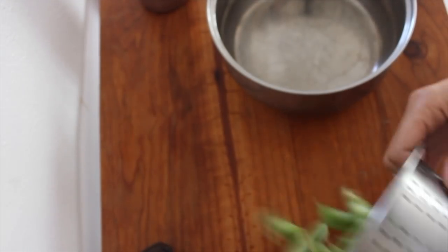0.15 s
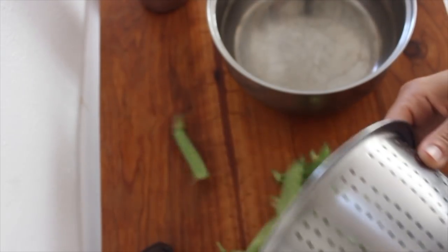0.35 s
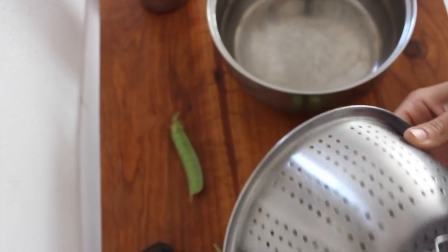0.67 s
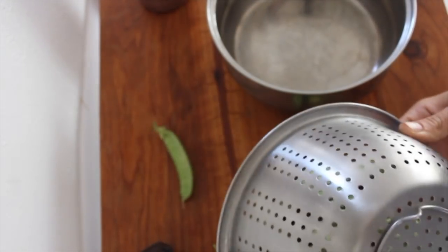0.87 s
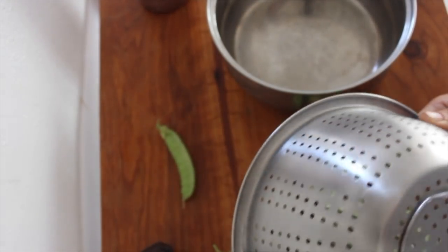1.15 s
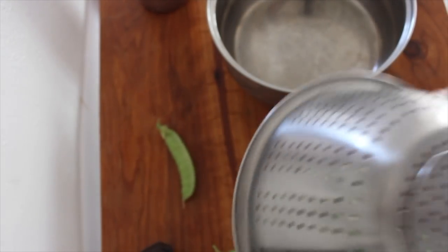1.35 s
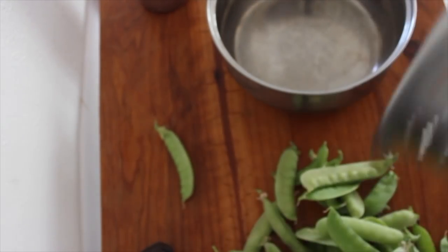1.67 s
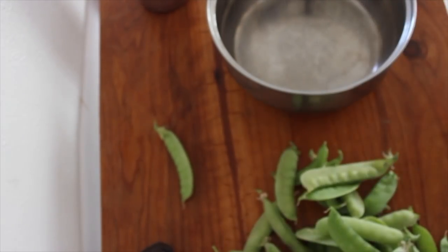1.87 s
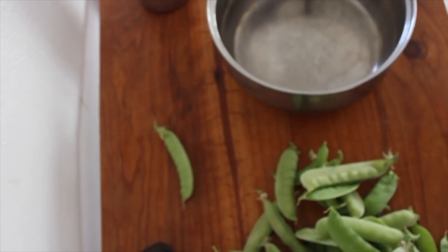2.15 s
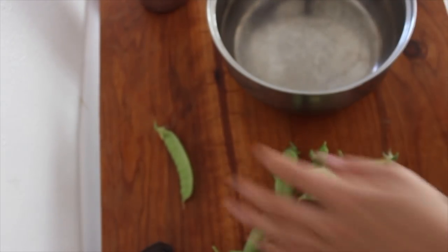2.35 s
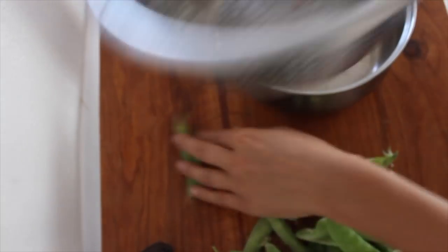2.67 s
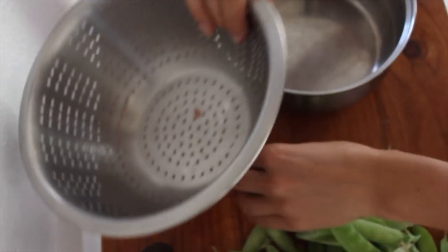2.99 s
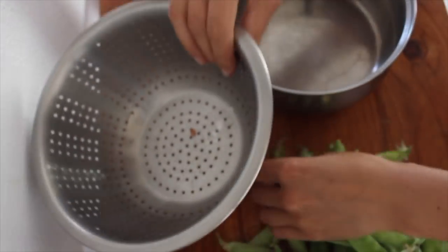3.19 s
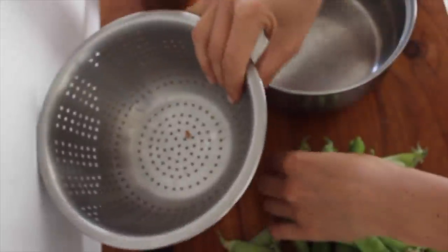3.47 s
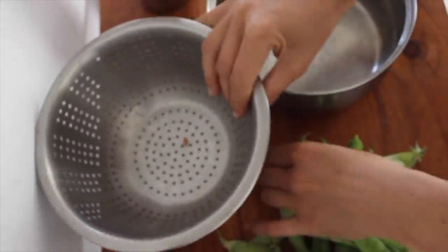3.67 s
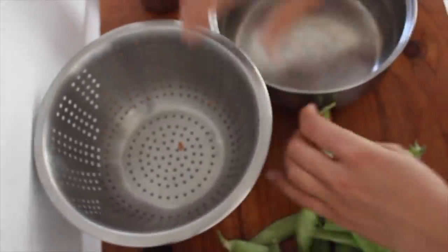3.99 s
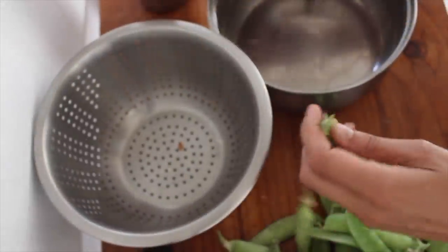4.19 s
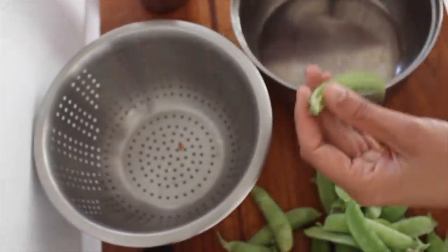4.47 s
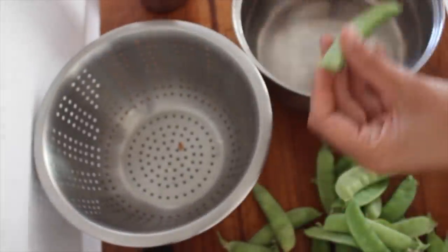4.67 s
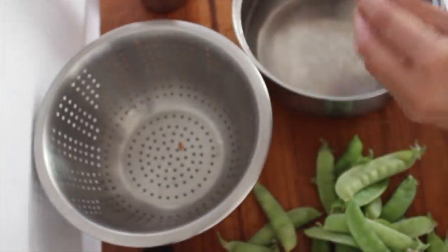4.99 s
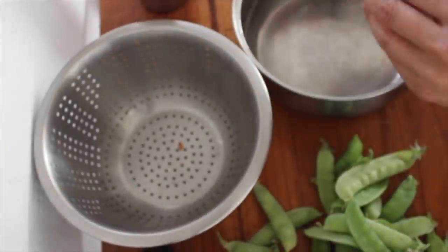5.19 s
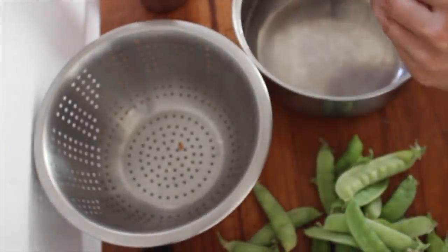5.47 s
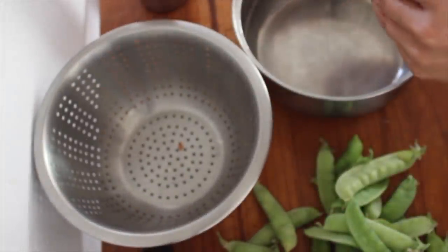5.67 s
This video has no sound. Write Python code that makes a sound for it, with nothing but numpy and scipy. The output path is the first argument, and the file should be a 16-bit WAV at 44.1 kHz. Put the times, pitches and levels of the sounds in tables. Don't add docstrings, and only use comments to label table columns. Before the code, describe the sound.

One close microphone in a quiet outdoor spot: a sudden hard knock with a metallic clank, then pods pattering and snapping on hollow wood, fading within about a second and a half. Soft touches and a brush of fingers lead to a colander set down, a bright clink, short gritty drags and low bumps, then only faint hiss and insects.

```python
import sys
import numpy as np
from scipy import signal
from scipy.fft import rfft, irfft
from scipy.io import wavfile

SR = 44100
rng = np.random.default_rng(int(sys.argv[2]) if len(sys.argv) > 2 else 0)


def output_pcm(signal):
    pcm = np.clip(np.atleast_2d(signal).T, -1, 1) * 32767
    wavfile.write(sys.argv[1], SR, np.round(pcm).astype(np.int16))


def gain_from_decibels(decibels):
    exponent = np.asarray(decibels, float) / 20
    return 10 ** exponent


N = 257544

# mode_hz, level_db, t60_s
TABLE_MODES = [(185, -10, 0.24), (205.6, -9, 0.24), (253.1, -4, .3), (300.4, -9, 0.2), (334, 1.5, 0.2),
               (397.8, -5.5, .2), (464.2, -8, 0.12), (548.4, -8.5, 0.182), (607.4, -8.5, 0.199),
               (648, 0.5, 0.12), (695, -2.5, 0.12), (746, -1.5, 0.14), (768, -5, 0.14), (813, -14, 0.16),
               (916, -10.5, 0.14), (1017, -11, 0.093), (1150, -11, 0.12), (1356, -5.5, 0.083),
               (1358, -8, 0.098), (1674, -14.5, 0.063)]
# mode_hz, level_db, t60_s
STEEL_MODES = [(1042, -18.5, 0.37), (1320, -8.5, .3), (1330, -1.5, 0.21), (1470, -15, 0.43),
               (1566, -3, 0.15), (1710, -4.5, 0.18), (1940, -19.5, 0.5), (2110, -10, 0.12),
               (2470, -10, 0.1), (2630, -5, 0.09), (2796, -18, 0.13), (3079, -9.5, 0.15), (4133, -16, .1),
               (5140, -6, 0.2), (5640, -3, 0.052), (6200, -2.5, 0.043), (6800, -6.5, 0.2),
               (7430, -7, 0.0525), (8110, 5, 0.07), (9000, -5.5, 0.12), (8570, 4, 0.09),
               (10800, -22, 0.093)]
# start_s, peak_db
THUMPS = [(0.053, -25), (.23, -36), (0.397, -31), (.7, -34.5), (1.029, -39), (1.2, -46.5), (1.448, -41),
          (1.842, -38.5), (2.64, -43), (2.698, -57), (2.96, -45), (3.1, -40.5), (3.5, -22), (3.828, -30),
          (3.945, -25), (3.979, -40), (4.246, -30), (4.298, -48)]


def rms_one(x):
    return x / np.sqrt(np.mean(x ** 2) + 1e-20)


def in_time(rows):
    s, *columns = np.transpose(rows)
    return [np.interp(np.arange(N) / SR, s, c, -140, -140) for c in columns]


def drift(rate_hz):
    knots = rng.standard_normal(400)
    return np.interp(np.arange(N) / SR * rate_hz, np.arange(400), knots)


def swell(middle_s, half_s):
    return np.exp(-((np.arange(N) / SR - middle_s) / half_s) ** 2)


def coloured(x, spectrum):
    hz, db = np.transpose(spectrum)
    log_hz = np.log(np.fft.rfftfreq(len(x), 1 / SR) + 1)
    gain = gain_from_decibels(np.interp(log_hz, np.log(hz), db))
    return rms_one(irfft(rfft(x) * gain, len(x)))


def grains(per_s, spread_db):
    sizes = gain_from_decibels(spread_db * np.minimum(rng.exponential(1, N), 4))
    signs = rng.choice([-1, 1], N)
    happens = rng.random(N) < per_s * gain_from_decibels(4 * drift(25)) / SR
    return sizes * signs * happens + 1e-18


def ring(x, hz, t60):
    r, w = gain_from_decibels(-60 / (t60 * SR)), 2 * np.pi * hz / SR
    return signal.lfilter([0, np.sin(w)], [1, -2 * r * np.cos(w), r * r], x)


def ring_twice(x, hz, width_hz):
    t60 = 2.2 / width_hz
    return rms_one(ring(ring(x, hz, t60), hz, t60))


def band(x, low_hz, high_hz):
    return signal.sosfilt(signal.butter(2, [low_hz, high_hz], "band", fs=SR, output="sos"), x)


def burst(t60, size=13000):
    return rng.standard_normal(size) * gain_from_decibels(-60 * np.arange(size) / SR / t60)


def add(track, s, db, sound):
    i = round(s * SR)
    track[i:i + len(sound)] += (gain_from_decibels(db) * sound / np.max(np.abs(sound)))[:N - i]


def struck(modes, contact_s, damping, scatter_db, centre_hz, slope_db, rise_s):
    contact = burst(contact_s)
    contact *= 1 - np.exp(-np.arange(len(contact)) / SR / rise_s)
    out = 0
    for hz, db, t60 in modes:
        away_db = slope_db * abs(np.log2(hz / centre_hz))
        level_db = db + scatter_db * rng.standard_normal() - away_db
        out = out + gain_from_decibels(level_db) * ring(contact, hz, t60 * damping)
    return out


def outdoors():
    # freq_hz, level_db
    air_curve = [(12, -23.5), (20, -6.5), (193, -10.5), (270, -10.5), (328, -13.5), (377, -8.5), (738, -10),
                 (1760, -14.5), (2820, -14), (3840, -16), (4940, -11), (5850, -16), (16000, -18.5)]
    # centre_hz, width_hz, level_db, flicker_db
    choruses = [
        (4930, 420, -67.5, -2.5),
        (3000, 790, -69, 6),
        (1140, 770, -67, -4),
    ]
    # middle_s, half_length_s, level_db
    rasp_rows = [
        (1.568, 0.056, -60),
        (1.693, 0.038, -57.5),
        (1.804, 0.039, -57),
        (2.026, 0.032, -60),
        (2.138, 0.028, -59),
        (4.743, 0.038, -64),
    ]
    out = gain_from_decibels(-57) * coloured(rng.standard_normal(N), air_curve)
    for hz, width_hz, db, flicker_db in choruses:
        chorus = ring_twice(rng.standard_normal(N), hz, width_hz)
        out += gain_from_decibels(db + flicker_db * drift(6.2)) * chorus
    rasp = rms_one(band(band(grains(3300, spread_db=3.0), 2460, 3500), 2460, 3500))
    return out + rasp * sum(gain_from_decibels(db) * swell(s, half_s) for s, half_s, db in rasp_rows)


def room(x):
    tail = band(burst(0.31, size=30000), 210, 3600)
    echoes = np.pad(tail / np.linalg.norm(tail), (300, 0))
    return gain_from_decibels(-13) * signal.fftconvolve(x, echoes)[:N]


def shudder(level):
    # freq_hz, level_db
    shake_curve = [(8.8, -28), (15, -5), (27, 2.5), (43, -5.5), (75, -2), (113, -9), (170, -6.5),
                   (220, -30), (370, -120)]
    legs = rms_one(ring(band(rng.standard_normal(N), 40, 96), 63, .08))
    shake = coloured(rng.standard_normal(N), shake_curve)
    return level * (0.68 * shake + 0.26 * legs) * gain_from_decibels(2.7 * drift(5.8))


def rocking():
    loss_db_per_s, rise_s = 45.5, 0.011
    start_s, peak_db = np.array(THUMPS)[:, :1], np.array(THUMPS)[:, 1:]
    after = np.arange(N) / SR - start_s
    level = gain_from_decibels(peak_db - 3.5 - loss_db_per_s * after) * np.clip(after / rise_s, 0, 1)
    return np.sqrt(np.sum(level ** 2, axis=0))


def thumps():
    out = np.zeros(N)
    for s, db in THUMPS:
        add(out, s, db - 7.5, ring(band(burst(0.078), 30, 106.6), 36, 0.16))
    return out


def hums():
    # middle_s, half_length_s, level_db, pitch_hz, width_hz
    hum_rows = [(4.38, 0.087, -55.5, 6130, 220), (1.675, 0.16, -56.5, 276, 130),
                (3.66, 0.11, -53, 500, 110), (3.67, 0.2, -46, 169, 79), (4.445, 0.17, -45, 458, 65),
                (3.57, .02, -58, 6750, 300), (4.4, 0.089, -58, 8000, 90), (4.33, .02, -49, 1200, 97),
                (0.878, .025, -30.5, 410, 200), (3.25, 0.068, -59, 450, 47), (.12, .03, -37.5, 1860, 270),
                (4.34, 0.052, -58, 6800, 150), (3.79, .05, -48, 6750, 120), (3.91, .035, -49, 7800, 200),
                (3.91, .03, -56, 5500, 150), (3.885, .012, -52, 6150, 200), (.755, .03, -48, 8600, 1200),
                (0.86, 0.037, -54, 8700, 200), (0.865, 0.037, -56, 7450, 120), (.1, 0.028, -25, 380, 130)]
    noise, out = rng.standard_normal(N), np.zeros(N)
    for s, half_s, db, hz, width_hz in hum_rows:
        near = slice(max(round((s - .5) * SR), 0), round((s + .5) * SR))
        out[near] += gain_from_decibels(db) * swell(s, half_s)[near] * ring_twice(noise[near], hz, width_hz)
    return out


def swishes():
    # middle_s, half_length_s, level_db, low_hz, high_hz
    strokes = [(0.3, 0.073, -45, 3000, 15100), (0.762, 0.069, -46.5, 1978, 12400),
               (2.288, 0.05, -54, 2410, 10900), (2.528, 0.05, -57, 2200, 7860),
               (2.646, 0.017, -48, 5000, 15000), (3.19, 0.03, -38.5, 1480, 10000),
               (3.81, 0.022, -50.5, 4500, 15100), (4.37, 0.093, -55.5, 5800, 6800),
               (4.55, 0.028, -57, 5700, 7020), (0.044, 0.011, -40, 9000, 15500),
               (2.063, .02, -53.5, 12800, 14750), (3.23, 0.14, -53, 1610, 4640),
               (4.908, 0.062, -60.5, 5000, 11980)]
    friction, out = grains(4000, spread_db=3.0), np.zeros(N)
    for s, half_s, db, low_hz, high_hz in strokes:
        brushed = rms_one(band(band(friction, low_hz, high_hz), low_hz, high_hz))
        out += gain_from_decibels(db) * swell(s, half_s) * brushed
    return out


def movement(weight_db, friction_db, rub_db, top, per_s, spread_db):
    # freq_hz, level_db
    rub_curve = [(590, -38), (1000, -17), (1510, -0.5), (1820, -0.5), (2070, -2), (2560, -3), (5500, -15),
                 (7150, -36.5), (12100, -120)]
    contacts, board = grains(per_s, spread_db), np.zeros(N)
    for k, (hz, db, t60) in enumerate(TABLE_MODES):
        tilt_db = 0.5 * np.log2(hz)
        board += (-1) ** k * gain_from_decibels(db + tilt_db) * ring(contacts, hz, 0.27 * t60)
    rub_level = gain_from_decibels(rub_db + friction_db + 0.34 * (weight_db - friction_db))
    rub = rub_level * coloured(grains(5000, spread_db=4.5), rub_curve)
    shake = shudder(gain_from_decibels(weight_db - 9.5))
    return shake + gain_from_decibels(weight_db) * rms_one(board) + rub + gain_from_decibels(friction_db) * top


def scrape():
    # freq_hz, level_db
    hiss_curve = [(2350, -47), (4000, -14), (6250, -9.5), (7480, -4), (8310, 4), (9770, -4.5), (13900, -12),
                  (16000, -27)]
    grit = grains(2800, spread_db=1.0) * gain_from_decibels(4.6 * drift(30))
    singing = np.zeros(N)
    for hz, db, t60 in STEEL_MODES:
        if hz > 4500:
            singing += gain_from_decibels(.6 * db + 2.5 * drift(9)) * rms_one(ring(grit, hz, .3 * t60))
    hiss = coloured(grains(6800, spread_db=3.0), hiss_curve)
    return rms_one(0.7 * rms_one(singing) + 1.04 * hiss)


def shoves():
    # start_s, pressure_db, sliding_db, loss_db_per_s
    shove_rows = [(3.439, -47.5, -53, 142), (3.512, -36, -44.5, 96), (3.66, -49, -55.5, 15),
                  (3.785, -53, -50, 40), (3.818, -41, -58, 95), (3.9, -48.5, -46, 72),
                  (3.986, -31, -53, 59), (4.259, -50, -44, 400), (4.321, -36.5, -50, 36),
                  (4.46, -40, -54, 55), (4.55, -42, -59, 99)]
    attack_s, hold_s = 0.016, 0.11
    t, power = np.arange(N) / SR, np.full((2, N), 1e-14)
    for s, pressure_db, sliding_db, loss in shove_rows:
        after = np.maximum(t - s, 0)
        fall_db = -loss * (after + 3.5 * np.maximum(after - hold_s, 0))
        rise = np.clip(1 + (t - s) / attack_s, 0, 1)
        power += (rise * gain_from_decibels(fall_db) * gain_from_decibels(np.array([[pressure_db], [sliding_db]]))) ** 2
    return 10 * np.log10(power)


def dragged_steel():
    return movement(*shoves(), rub_db=-5.5, top=scrape(), per_s=1500, spread_db=3.0)


def clinks():
    # start_s, peak_db, pitch_hz, bright_db re peak, damping_share
    clink_rows = [
        (0.0584, -11.5, 1540, -11, 0.17),
        (3.1526, -22, 2640, -8, 0.49),
        (3.436, -43, 2520, 17, 0.24),
        (3.5041, -17, 2290, -15.5, 0.66),
        (3.5704, -18.5, 1800, -10.5, 0.32),
        (3.8195, -38, 2130, -25, 0.38),
        (3.8687, -36, 1710, 5.5, 0.28),
        (3.949, -26.5, 2320, -3, 0.59),
        (3.983, -10.5, 3300, -11.5, 0.51),
        (4.25, -42.5, 3170, 7, 0.8),
    ]
    # start_s, pitch_hz, peak_db, contact_s, t60_s
    ring_rows = [(.484, 5700, -39, 0.088, 0.04), (.759, 1175, -39, 0.21, .04),
                 (.94, 1180, -31.5, 0.21, 0.0097), (.979, 1124, -29.5, 0.056, 0.025),
                 (1.376, 1183, -41, 0.028, 0.043), (2.898, 1105, -38, 0.048, .16),
                 (2.899, 457, -35.5, 0.052, .04), (.057, 1500, -9.5, 0.094, 0.013),
                 (3.568, 3960, -40.5, 0.016, 0.038), (3.504, 5250, -40, .011, 0.068),
                 (4.34, 300, -25, 0.25, 0.059), (3.435, 2420, -37.5, .03, 0.018),
                 (3.508, 2143, -45, .006, .5), (3.56, 1708, -36, .02, .15), (3.821, 1705, -42, .012, .15),
                 (3.885, 2722, -43, .02, .7), (3.992, 3079, -30, .003, .17), (3.99, 1959, -55, .02, 1.0),
                 (2.66, 280, -47.5, 0.39, 0.1), (3.04, 318, -39.5, 0.65, 0.11), (2.94, 433, -43, 0.2, 0.13),
                 (4.0, 168.5, -27, 0.23, .06), (4.545, 328, -37.5, 0.23, 0.063)]
    out = np.zeros(N)
    low = [m for m in STEEL_MODES if m[0] < 4500]
    bright = [m for m in STEEL_MODES if m[0] > 4500]
    for s, db, hz, bright_db, damping in clink_rows:
        body = struck(low, 0.0052, damping, scatter_db=-2.5, centre_hz=hz, slope_db=23.5, rise_s=0.00025)
        add(out, s, db - 5.5, body)
        sheen = struck(bright, 0.047, 0.68 * damping, scatter_db=1.5, centre_hz=8280, slope_db=0.5,
                       rise_s=0.00031)
        add(out, s, db + bright_db - 2.5, sheen)
    for s, hz, db, contact_s, t60 in ring_rows:
        contact = band(burst(contact_s, size=30000), hz / 1.176, hz * 1.135)
        add(out, s, db, ring(contact, hz, t60))
    return out


def taps():
    # start_s, peak_db, pitch_hz
    pod_rows = [(0.0579, -9, 1677), (0.0584, -5, 705), (0.0609, -6.5, 214.6), (0.0683, -15, 805),
                (0.0753, -21, 1700), (0.0778, -17, 695), (0.0823, -20.5, 1150), (0.1691, -44, 3300),
                (0.21, -41, 3280), (0.211, -32, 1675), (0.2574, -13.5, 1404), (0.2599, -14, 830),
                (0.2639, -21, 1984), (0.2774, -20.5, 2750), (0.2784, -5.5, 730), (0.2893, -12, 670),
                (0.2928, -24, 3031), (0.2925, -8, 331), (0.3223, -16.5, 1510), (0.3293, -14.5, 1090),
                (0.3542, -24, 2170), (0.4041, -14.5, 1096), (0.4046, -20, 300), (0.419, -18, 503),
                (0.4305, -19, 470), (0.4724, -24.5, 724), (0.4824, -21.5, 304), (0.5248, -43, 2760),
                (0.5403, -29, 450), (0.5433, -25.5, 836), (0.5448, -39, 3330), (0.5542, -35, 710),
                (0.641, -26.5, 653), (0.65, -33, 710), (0.658, -40, 781), (0.6949, -33, 1690),
                (0.6954, -31, 710), (0.6979, -25, 327), (0.7054, -25, 633), (0.7059, -28, 2000),
                (0.7124, -24, 390), (0.7149, -33, 717), (0.7443, -29, 2400), (0.7767, -33, 1096),
                (0.8266, -38.9, 1539), (0.861, -25, 2330), (0.8695, -27, 2340), (0.8845, -25, 1850),
                (0.8865, -23.5, 930), (0.8875, -22, 420), (0.9179, -37, 2785), (0.9449, -26.5, 474),
                (0.9678, -25.5, 1180), (0.9833, -23, 1160), (1.0267, -35.5, 2300)]
    # start_s, peak_db, pitch_hz
    stray_rows = [(1.0395, -37, 364), (1.08, -42, 396), (1.0935, -52, 3300), (1.143, -43, 427),
                  (1.2665, -47, 1984), (1.2671, -43, 3320), (1.3809, -50, 606), (1.3814, -48, 1007),
                  (1.4263, -39, 606), (1.466, -38, 1810), (1.5034, -44, 1096), (1.6632, -35, 396),
                  (1.8069, -42, 1810), (1.848, -43, 1675), (1.9251, -49, 2160)]
    # start_s, peak_db, pitch_hz
    steel_rows = [(2.644, -39.5, 730), (2.6475, -32, 268), (2.6585, -40, 717), (2.8984, -40, 3100),
                  (2.9024, -43, 925), (2.9099, -51, 2360), (2.9134, -33, 432), (2.9164, -40, 875),
                  (2.9693, -46, 2820), (3.067, -46, 3360), (3.0805, -44.5, 2000), (3.1005, -48, 2785),
                  (3.1179, -46, 3320), (3.1568, -27, 2500), (3.1683, -32, 3031), (3.1803, -32.8, 2785),
                  (3.1898, -39, 3031), (3.2052, -40, 2785), (3.2391, -39, 3300), (3.3349, -48.1, 1984),
                  (3.3818, -37, 307), (3.3828, -42, 845), (3.3933, -38.4, 312), (3.4382, -39, 2351),
                  (3.4716, -46.5, 925), (3.506, -20, 2350), (3.512, -23.5, 272), (3.5285, -35, 1960),
                  (3.535, -31, 2150), (3.5619, -30, 1675), (3.5754, -34, 1984), (3.721, -43, 2351),
                  (3.8228, -26, 2330), (3.8373, -38, 2020), (3.8597, -39, 840), (3.95, -18, 2300),
                  (3.964, -36, 2130), (3.9854, -36, 1520), (3.9864, -26, 2785), (3.9934, -26, 2800),
                  (4.0024, -23, 1290), (4.0189, -22.5, 412), (4.0523, -39, 1539), (4.0673, -40, 710),
                  (4.1186, -43, 2530), (4.2528, -48.4, 915), (4.2603, -44, 3320), (4.3027, -27.5, 340),
                  (4.3481, -20.5, 256), (4.4863, -37, 307), (4.5532, -37, 364), (4.5676, -42, 1539)]
    out, t = np.zeros(N), np.arange(4000) / SR
    for rows, crest_cycles in (pod_rows, 0.79), (stray_rows, 0.79), (steel_rows, 1.114):
        for s, db, hz in rows:
            crest_s = crest_cycles / hz + 0.0004
            tone = np.sin(2 * np.pi * hz * t) + 0.3 * np.sin(2 * np.pi * 1.55 * hz * t)
            add(out, s - crest_s, db, t * np.exp(-t / crest_s) * tone)
    return out


def snaps():
    # start_s, peak_db, centre_hz
    snap_rows = [(.0393, -22, 14600), (.0568, -17, 8400), (.1166, -29, 15000), (.167, -30, 5860),
                 (.1819, -17, 14500), (.2208, -15, 8750), (.2339, -15, 13000), (.2633, -17, 5870),
                 (.2954, -22, 6180), (.339, -25, 4540), (.4184, -18, 4300), (.4787, -27, 12500),
                 (.5394, -32, 8030), (.6419, -25.5, 4650), (.7422, -23.5, 8500), (.862, -28, 5640),
                 (.8885, -29, 8800), (.9717, -29.5, 9000), (1.0264, -33, 7240), (1.1423, -20.5, 13900),
                 (1.2644, -35.5, 4930), (1.4187, -34, 4800), (1.4606, -31, 13500)]
    # start_s, peak_db, centre_hz
    scuff_rows = [(2.0532, -39, 14100), (2.0802, -33.5, 13700), (2.6289, -36, 8170), (2.9392, -35.5, 5600),
                  (3.0989, -46, 11300), (3.1163, -29, 8200), (3.1557, -21, 8550), (3.4805, -29, 8550),
                  (3.7179, -32, 8600), (3.7928, -25.5, 7700), (4.0801, -36, 11400), (4.5371, -35.5, 8430)]
    out = np.zeros(N)
    for rows, t60 in (snap_rows, .032), (scuff_rows, 0.13):
        for s, db, hz in rows:
            pitched = band(burst(t60) + 1.7 * burst(0.12 * t60), hz / 1.2, hz * 1.2)
            broad = band(burst(0.82 * t60), 3500, 19000)
            add(out, s, db - 4.0, pitched + 0.54 * broad)
    return out


def heap():
    # time_s, weight_db on the board, friction_db of the skins
    heap_rows = [(0, -71, -54.5), (.12, -41.5, -42.5), (.254, -33, -48.5), (.262, -20.5, -37.5),
                 (.49, -35, -47.5), (.79, -50, -59), (.86, -37.5, -46.5), (1.0, -47, -57),
                 (1.33, -58.5, -56.5), (1.47, -51, -58), (1.66, -69, -78), (1.89, -53, -60),
                 (2.24, -69.5, -70), (2.54, -79.5, -62.5), (2.69, -54, -64.5), (2.85, -62, -68),
                 (3.21, -59.5, -52.5), (3.42, -45, -62.5)]
    # freq_hz, level_db
    rustle_curve = [(2350, -29), (4000, -3.5), (5670, 2), (7100, -3), (8550, 4.5), (10100, -1.5),
                    (11600, 0.5), (16000, -6)]
    rustle = coloured(grains(4400, spread_db=3.0), rustle_curve)
    return movement(*in_time(heap_rows), rub_db=-4, top=rustle, per_s=900, spread_db=3.0)


def board_blow(out, s, db, hz, edge_db, t60, upper_db):
    s += .0015
    damping = t60 / 0.21
    low = [m for m in TABLE_MODES if m[0] < 520]
    upper = [m for m in TABLE_MODES if m[0] > 520]
    boom = struck(low, 0.044, damping, scatter_db=4.5, centre_hz=hz, slope_db=9.0, rise_s=0.00068)
    add(out, s, db - 6.5, band(boom, 154, 9800))
    knock = struck(upper, 0.047, damping, scatter_db=1.0, centre_hz=720, slope_db=3.0, rise_s=0.0012)
    add(out, s, db + upper_db - 0.5, knock)
    add(out, s, db + edge_db, band(burst(.5 * t60) + 0.98 * burst(0.024), 1210, 2670))


def bumps():
    # start_s, peak_db, upper_db re peak, edge_db re peak, t60_s
    bump_rows = [(2.639, -27, -9.5, -33, 0.077), (2.899, -38.5, -6, -3, 0.25),
                 (3.089, -31.5, -31, -18, 0.31), (3.377, -27.5, -5.5, -23, 0.098),
                 (3.503, -24.5, -25, 4, 0.21), (3.559, -25, -14, -4, 0.2), (3.818, -27.5, -24.5, 4, 0.11),
                 (3.948, -20, -30, 2.5, 0.12), (3.982, -16, -13, -5.5, 0.25), (4.298, -23, -9, -23, 0.43),
                 (4.343, -22, -7.5, -33, 0.47), (4.481, -37, -12, -10, 0.81), (4.581, -28.5, -4, -27, 0.15)]
    out = np.zeros(N)
    for s, db, upper_db, edge_db, t60 in bump_rows:
        board_blow(out, s, db, 290, edge_db, t60, upper_db)
    return out


def drops():
    # start_s, peak_db, pitch_hz, edge_db re peak
    drop_rows = [(.055, -2.5, 369.5, -6.5), (.254, -6.5, 350, -19), (.274, -5.5, 330, -16),
                 (.291, -14, 334, -19.5), (.398, -6.5, 290, -36), (0.473, -20, 280, -21),
                 (0.535, -20, 250, -37), (0.636, -23, 366, -22), (.692, -13, 335, -15.5),
                 (.829, -20, 345, -24), (.858, -20, 450, -3), (.884, -22, 463, -17),
                 (.969, -30.5, 312, -5.5), (1.027, -36, 334, -8), (1.074, -30.5, 423, -29),
                 (1.138, -27, 471, -36), (1.259, -39, 396, 1), (1.377, -34, 331, -13),
                 (1.423, -32, 493, -18), (1.459, -27, 364, -12), (1.657, -27, 350, -22),
                 (1.918, -26, 327, -13)]
    out = np.zeros(N)
    for s, db, hz, edge_db in drop_rows:
        upper_db = -10 + 0.2624 * (db + 20)
        board_blow(out, s, db, hz, edge_db, 0.13, upper_db)
    return out


def scene():
    # freq_hz, level_db
    apart_curve = [(25, -6.5), (100, -4.5), (4290, -4.5), (4870, -4), (6560, -5), (15000, -7),
                   (16000, -19.5)]
    blows = drops() + bumps() + thumps() + clinks() + snaps() + taps()
    slides = heap() + dragged_steel() + swishes() + hums()
    mono = blows + room(blows) + slides + shudder(rocking()) + outdoors()
    hiss = gain_from_decibels(-63.5) * coloured(rng.standard_normal(N), apart_curve)
    flutter = gain_from_decibels(-47.5) * drift(60) * np.roll(mono, 90)
    side = hiss + flutter
    return np.array([mono + side, mono - side])


def band_limit(x):
    return signal.sosfilt(signal.butter(12, 16820, fs=SR, output="sos"), x)


def record(dry):
    bass_cut = signal.butter(2, 34, "high", fs=SR, output="sos")
    top_cut = signal.ellip(10, .5, 60, 15950, fs=SR, output="sos")
    clipped = np.clip(signal.sosfilt(bass_cut, dry), -1, 1)
    return band_limit(signal.sosfilt(top_cut, clipped))


dry = scene()
out = record(dry)
output_pcm(out)
```